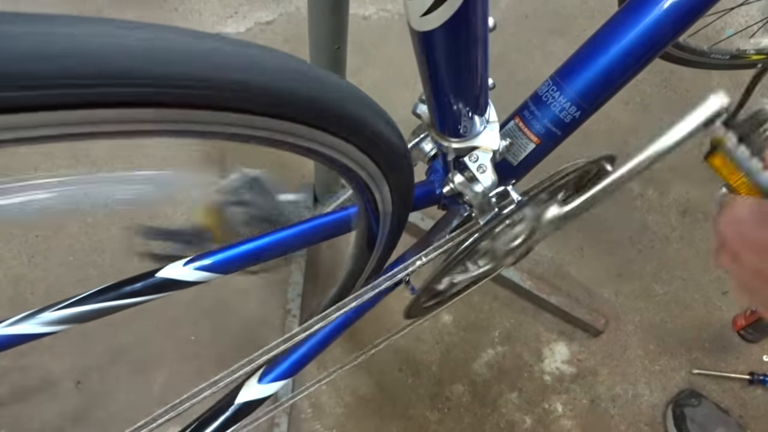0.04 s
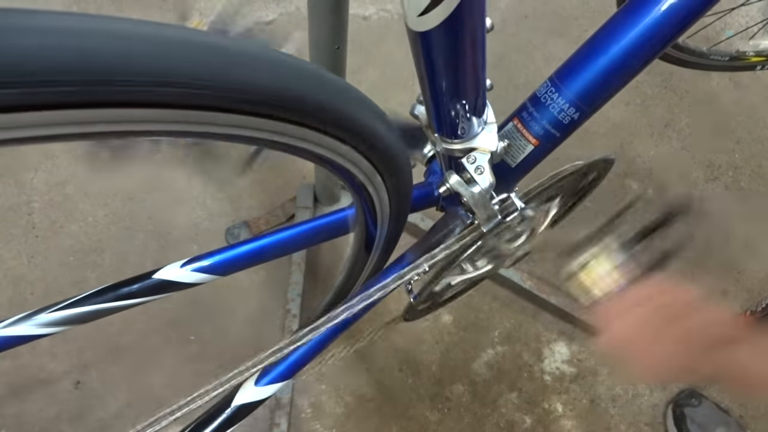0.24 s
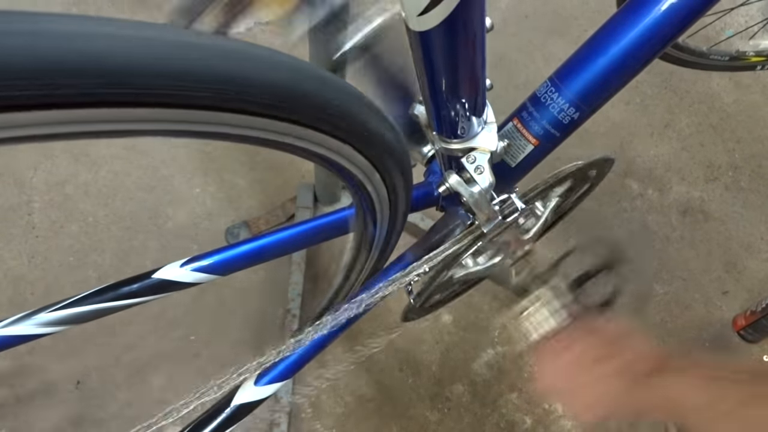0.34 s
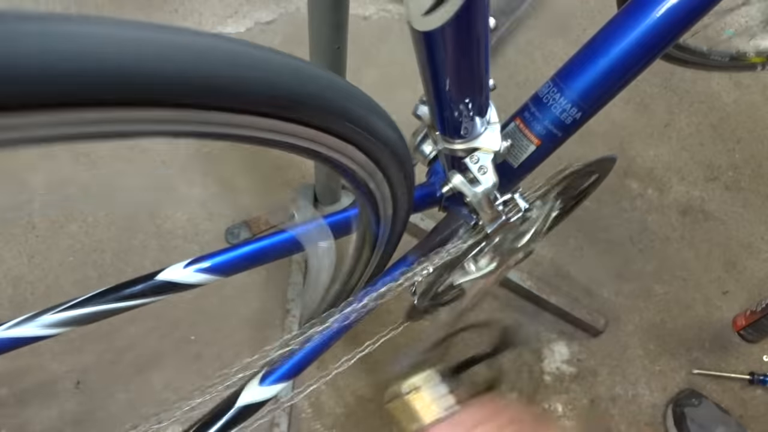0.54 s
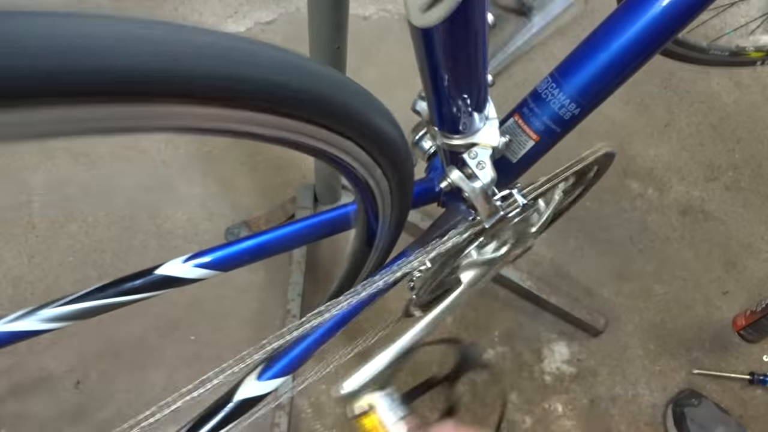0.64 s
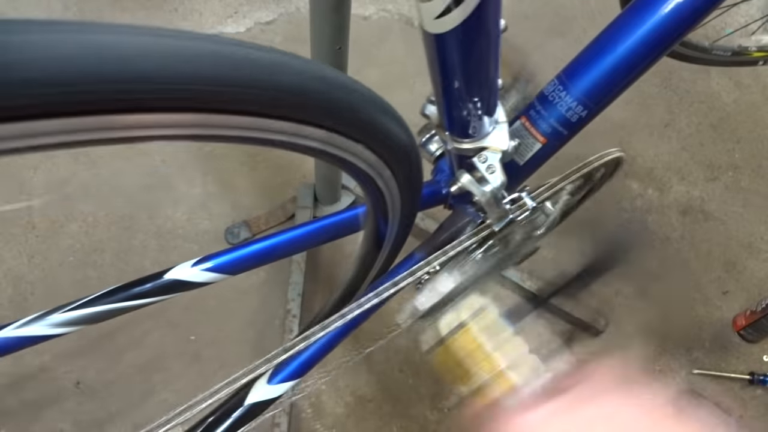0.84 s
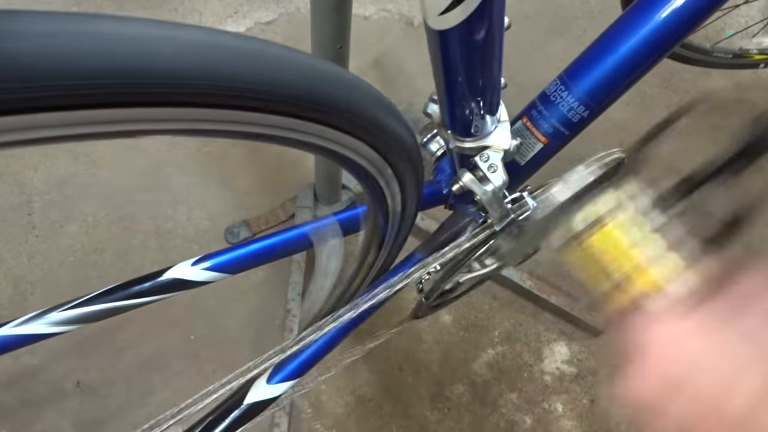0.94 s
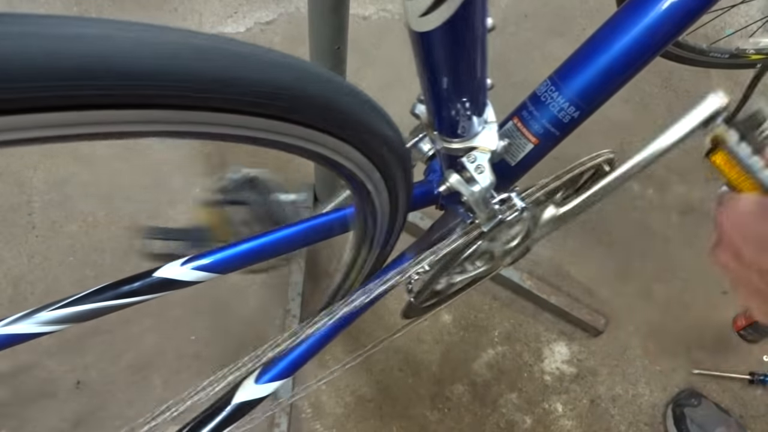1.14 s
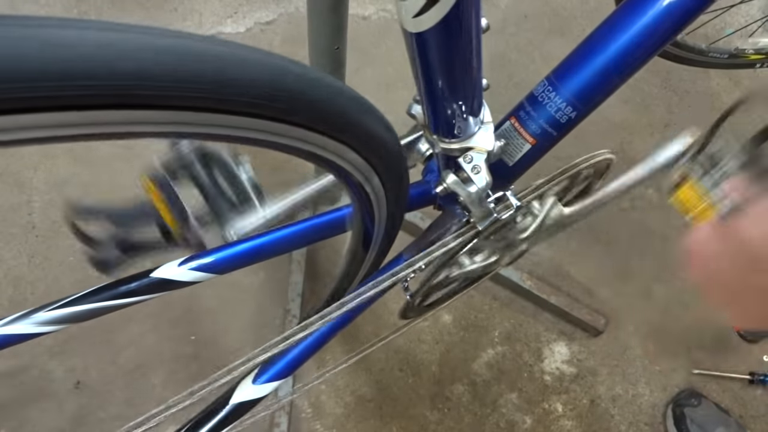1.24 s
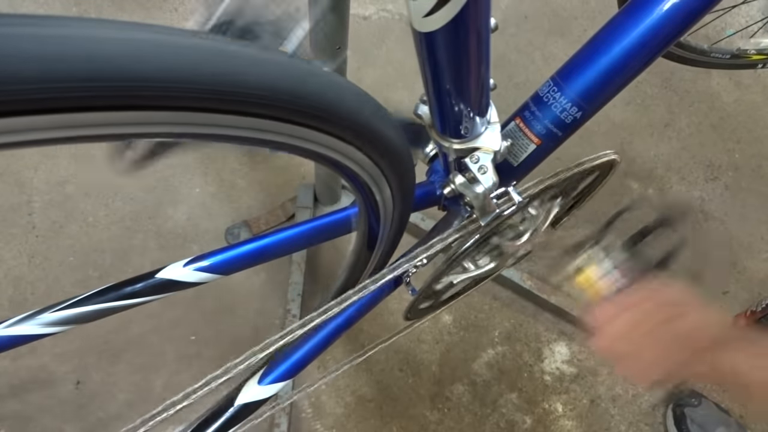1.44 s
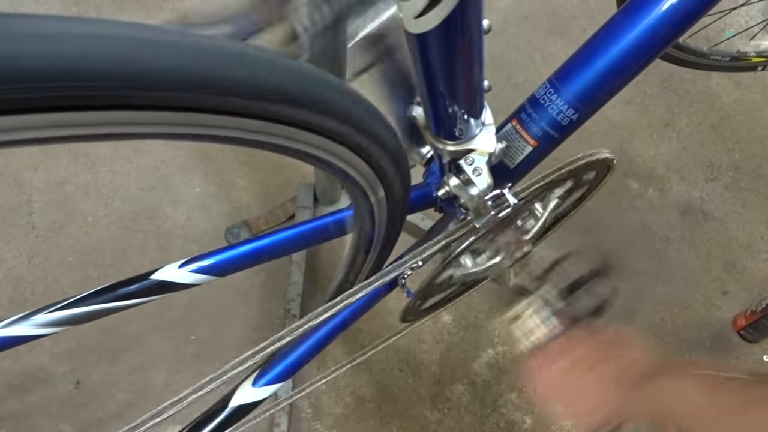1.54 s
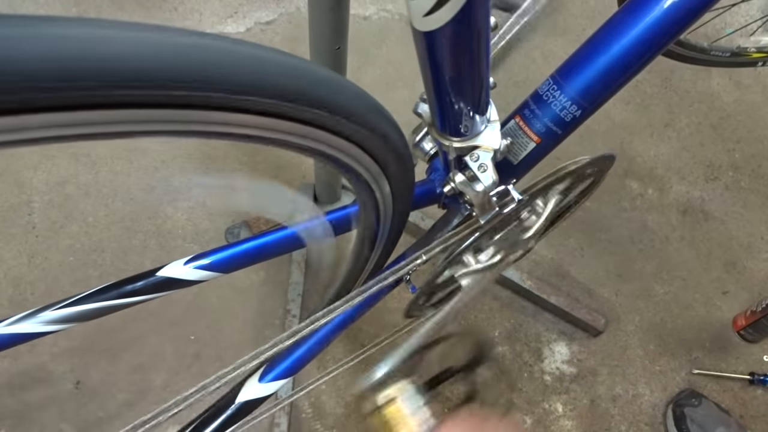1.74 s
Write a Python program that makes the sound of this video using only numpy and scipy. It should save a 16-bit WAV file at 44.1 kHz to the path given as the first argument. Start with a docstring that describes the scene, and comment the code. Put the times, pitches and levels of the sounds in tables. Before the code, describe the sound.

A bicycle chain, cranked by hand, ticks rapidly and softly over metal teeth. From 0.23 to 0.7 seconds it scrapes and clatters across the gears in a dense, bright rattle. It runs lightly again, with a hollow pedal knock near 1.1. A hard clank hits at 1.22, then a short crunching shift at 1.37-1.46, fading to quiet ticking. Close, hard-walled workshop echo, faint steady low background noise.

```python
"""In a hard-walled workshop, a bicycle on a repair stand is cranked by hand. Its chain ticks over
the teeth, then twice climbs across the gears: it scrapes, clashes with the cogs and drops into place.
Bursts of tiny contacts excite the frame, chainring, cogs and links, each a crack with ringing modes.
A loose pedal knocks, the stand thuds, steady noise lies behind and fading noise makes the room's echo."""
import sys
import numpy as np
from scipy import signal
from scipy.fft import rfft, irfft
from scipy.io import wavfile

SR = 44100
rng = np.random.default_rng(int(sys.argv[2]) if len(sys.argv) > 2 else 0)


def generate_wav(signal):
    """Clip the signal to [-1, 1] and save it as 16-bit WAV at the path in sys.argv[1]."""
    frames = np.transpose(np.atleast_2d(signal))
    scaled = np.clip(frames, -1, 1) * 32767
    pcm = np.round(scaled).astype(np.int16)
    wavfile.write(sys.argv[1], SR, pcm)


N = 79380  # length in samples: 1.8 s

# steady background noise: colour (f/Hz, level/dB)
BACKGROUND_COLOUR = [(25, -15), (55, -11), (85, -4.5), (120, -9.5), (165, 1.5), (250, 0), (520, 1),
                     (1000, -3.5), (3000, -8), (15000, -67)]
BACKGROUND_DB = -45.5
# workshop echo (f/Hz, time to fade by 60 dB/s, level against the direct sound/dB)
ROOM_BANDS = [(122, 0.99, 2), (367, 0.63, -1.5), (1280, 0.64, -2), (3670, 0.49, -2.5), (8750, 0.33, -5),
              (15000, 0.16, -12.5)]
ROOM_DELAY_S = 0.00324
# left-right difference: background and echo, then the direct sound
ROOM_SIDE_DB, DIRECT_SIDE_DB = -11.5, -19
TOP_HZ = 15800  # treble above this is cut

# colour of each part's short crack (f/Hz, level/dB)
STAND_COLOUR = [(70, -31), (118, 3), (190, 2.5), (300, -7), (600, -25)]
FRAME_COLOUR = [(60, -43), (130, -10.5), (300, -3.5), (600, 4), (1500, -4.5), (2600, -6.5), (6000, -21)]
CHAINRING_COLOUR = [(500, -33), (1300, -7.5), (1900, -3), (2700, -1), (3400, -1.5), (4200, -6),
                    (9000, -19.5)]
COG_COLOUR = [(900, -50), (2800, -1), (4000, -2.5), (5400, -1.5), (8000, -7), (15000, -27)]
LINK_COLOUR = [(800, -29), (3500, -2), (7500, 2.5), (10500, 4.5), (14000, 1), (16000, 1)]
# ringing pitches of each part (f/Hz, level over the crack/dB, time for the clank to fade by 60 dB/s)
PEDAL_MODES = [(356, 14.4, 0.017), (999, 16.2, 0.026)]
FRAME_MODES = [(429.5, 5, 0.022), (747, -1.5, .03), (1267, 13, 0.015)]
CHAINRING_MODES = [(1773, 4.7, 0.014), (2073, 2.7, .025), (2512, 4.1, .018), (2692, 11.3, 0.016),
                   (3186, 4.2, 0.027), (3364, 0.93, 0.029)]
COG_MODES = [(4030, 14.7, 0.021), (4240, 5, 0.028), (4790, 6.6, 0.022)]
LINK_MODES = [(10260, -1.7, 0.024)]
# faint ring after each clank: level against the clank, time to fade by 60 dB
FREE_RING_DB, FREE_RING_T60_S = -15, 0.18
# the second shift uses a bigger chainring with lower pitches
BIG_RING_FROM_S, BIG_RING_SCALE = 0.9, 0.93

# tiny metal contacts
CONTACTS_PER_S, CONTACT_SPREAD_DB = 8000, 3
# chinks: very short pings mixed with the contacts
CHINK_LOW_HZ, CHINK_HIGH_HZ, CHINK_PITCHES = 2185, 15450, 48
CHINKS_PER_S, CHINK_DECAY_S, CHINK_DB = 2500, 0.0019, -2
# uneven colour of a volley: step between ripple points, size of the ripple
VOLLEY_RIPPLE_HZ, VOLLEY_RIPPLE_DB = 328.5, 5.5

# thuds of the jolted stand (t/s, level/dB)
THUDS = [(0.576, -41.5), (1.235, -38), (1.391, -39)]
THUD_DECAY_S = 0.024
# knocks of the loose pedal (t/s, level/dB)
PEDAL_KNOCKS = [(.095, -43), (.18, -35), (0.91, -31), (1.081, -23.5), (1.177, -34)]
PEDAL_FADE_S = 0.0028

# running chain over time (t/s, level of the links/dB)
RUNNING_LEVEL = [(0, -41.5), (.2, -38.5), (.5, -52), (.8, -38.5), (1.1, -38.5), (1.3, -35.5), (1.62, -40),
                 (1.8, -43.5)]
# places where links meet teeth (share of a link's period, tick decay/s, level/dB)
MESHES = [(0.1, 0.0099, 0), (0.701, 0.0015, -24)]
LINKS_PER_S, MESH_JITTER_S, TICK_SPREAD_DB = 33, 0.0024, 2.5
ROLL_DB = -7.5  # roller rustle against a full tick
# running sound in the other parts, against the links
RUN_FRAME_DB, RUN_RING_DB, RUN_COG_DB = -13, -17.5, -14

# one curve per shift: chain dragging over the teeth (t/s, frame level/dB, teeth level/dB, link level/dB)
SCRAPES = [
    [(.258, -45.5, -51, -24.5), (.305, -42, -35, -26.5), (.325, -31.5, -36.5, -24), (.44, -30, -33, -25),
     (.48, -42, -52, -36.5), (.56, -49, -59, -28), (.62, -43, -37, -29), (.66, -62, -60, -40)],
    [(1.374, -29, -32.5, -20), (1.405, -31.5, -26.5, -30), (1.435, -47, -43, -30), (1.47, -37, -49, -34),
     (1.52, -44, -42, -62)],
]
# catches of the plates within a scrape
CHATTER_PER_S, CHATTER_DECAY_S, CHATTER_DB = 110, 0.0015, 6.5

# chain clashes (t/s, length/s, frame knock level/dB, chainring clank level/dB, cog ring level/dB,
# link chink level/dB, struck cog f/Hz)
CLASHES = [ (0.2315, 0.0034, -44, -25, -40, -42, 4200), (0.2427, 0.004, -58, -28, -28.5, -25, 4220),
           (.2595, 0.0041, -48, -22.5, -29, -17.5, 4270), (0.265, 0.0081, -39, -48, -31, -24, 5400),
           (0.283, .0071, -38, -29, -24, -19.5, 4100), (0.29, 0.0073, -34, -21, -36, -38, 4070),
           (0.3086, .006, -17, -17.5, -42, -25, 4200), (0.317, 0.0055, -25, -22, -21.5, -24, 4020),
           (0.337, 0.013, -29, -28, -27.5, -22, 3820), (.371, 0.0091, -24.5, -26, -32, -18.5, 5200),
           (0.404, 0.0072, -28, -21, -25, -23, 4530), (0.4258, 0.0046, -20, -26, -30, -37, 4060),
           (.451, 0.0071, -24.5, -28, -20.5, -35, 4170), (.4905, 0.0059, -42, -25.5, -34, -37, 3980),
           (0.5022, 0.0096, -29.5, -21.5, -19.5, -22.5, 4040), (0.529, 0.0042, -55, -29, -31, -29, 4080),
           (0.5427, 0.0073, -27, -25.5, -24, -33, 4085), (0.5573, 0.0064, -35, -28.5, -19.5, -16, 5210),
           (0.579, 0.0095, -29, -33, -43, -23, 5140), (0.61, 0.0036, -31, -24.5, -21.5, -25, 5500),
           (0.6152, 0.0027, -41, -23.5, -17, -22, 5160), (0.629, 0.0077, -36, -29, -31, -32, 5160),
           (0.684, 0.0051, -24.5, -48, -35.5, -19, 5250), (0.804, 0.0016, -65, -57, -40, -28, 5300),
           (0.9704, 0.0037, -51, -36.5, -32, -49, 4020), (1.029, 0.0027, -65, -48, -49, -25.5, 5250),
           (1.081, 0.0026, -53, -33.5, -36, -17, 3700), (1.2242, 0.0041, -14, -17.5, -19, -22.5, 3990),
           (1.3734, 0.0042, -48, -23, -21.5, -19.5, 4340), (1.397, .0063, -20.5, -26, -21, -25, 4800),
           (1.409, 0.0041, -23, -30, -26, -27, 4070), (1.414, 0.0077, -30, -27, -38, -18, 4100),
           (1.425, 0.0052, -52, -24.5, -30, -19.5, 5150), (1.444, 0.0036, -29, -28, -22.5, -14.5, 4170),
           (1.455, 0.0061, -34, -30, -27, -26, 4300), (1.577, 0.0084, -55, -43, -34.5, -60, 3920),
           (1.773, 0.0016, -69, -63, -50, -32, 5250)]
ATTACK_S, RELEASE_S = 0.00026, 0.00144


def undb(db):
    """Turn decibels into gain."""
    return 10 ** (np.asarray(db) / 20)


def unit(x):
    """Scale a sound so its squared samples add up to one."""
    return x / np.sqrt(np.sum(x ** 2) + 1e-18)


def rms_one(x):
    """Scale a full-length sound to an average strength (rms) of one."""
    return np.sqrt(N) * unit(x)


def through(x, response):
    """Let a sound set off a body or room, given its answer to one sharp tap."""
    return signal.fftconvolve(x, response)[:N]


def add(out, start, sound):
    """Mix a sound in at its starting time."""
    at = int(start * SR)
    out[at:at + len(sound)] += sound[:N - at]


def crack(points, size=2048):
    """A short answer to a tap, with the given colour and its energy as early as possible."""
    hz, db = np.array(points).T
    pitch = np.log(np.fft.rfftfreq(size, 1 / SR) + 1)
    gain = undb(np.interp(pitch, np.log(hz), db))
    # folding the cepstrum (spectrum of the log gain) puts everything after the tap
    cepstrum = irfft(np.log(gain))
    cepstrum[1:size // 2] *= 2
    cepstrum[size // 2 + 1:] = 0
    return unit(irfft(np.exp(rfft(cepstrum))))


def part(colour, modes, scale=1):
    """A metal part cracks, its modes clank briefly, then ring on faintly; scale shifts its pitch."""
    t = np.arange(N // 6) / SR
    out = signal.unit_impulse(len(t))
    for hz, db, t60 in modes:
        wave = np.cos(2 * np.pi * hz * scale * t)
        for ring_db, ring_t60 in ((db, t60), (db + FREE_RING_DB, FREE_RING_T60_S)):
            fade = undb(-60 * t / ring_t60)
            out += 2 * undb(ring_db) * fade / fade.sum() * wave
    shifted_colour = [(hz * scale, db) for hz, db in colour]
    return unit(signal.fftconvolve(out, crack(shifted_colour)))


def contacts():
    """Dense tiny metal contacts: random clicks of uneven size, rms one."""
    hit = rng.random(N) < CONTACTS_PER_S / SR
    size = undb(CONTACT_SPREAD_DB * rng.standard_normal(N))
    return rms_one(hit * rng.choice([-1, 1], N) * size)


def chinks():
    """Sparse taps set off very short pings at many pitches, rms one."""
    out = 0
    for hz in np.linspace(CHINK_LOW_HZ, CHINK_HIGH_HZ, CHINK_PITCHES):
        hit = rng.random(N) < CHINKS_PER_S / CHINK_PITCHES / SR
        taps = hit * rng.standard_normal(N)
        # each step turns the ping a little and shrinks it
        turn = np.exp((2j * np.pi * hz - 1 / CHINK_DECAY_S) / SR)
        out = out + signal.lfilter([1], [1, -turn], taps).imag
    return rms_one(out)


def grind():
    """Dry contacts of metal on metal mixed with chinks, rms one."""
    return rms_one(contacts() + undb(CHINK_DB) * chinks())


def volley(shape):
    """A burst of contacts: noise under an envelope, with an uneven colour of its own."""
    hz = np.fft.rfftfreq(len(shape), 1 / SR)
    ripple = np.clip(rng.standard_normal(128), -1.5, 1.5)
    ripple_db = VOLLEY_RIPPLE_DB * np.interp(hz / VOLLEY_RIPPLE_HZ, np.arange(len(ripple)), ripple)
    # the ripple is weaker in the bass
    colour = undb(ripple_db * np.minimum(hz / CHINK_LOW_HZ, 1))
    burst = shape * rng.standard_normal(len(shape))
    # impose colour and envelope in turn, keeping the random phases
    for _ in range(2):
        phase = np.angle(rfft(burst))
        burst = np.sqrt(shape) * irfft(colour * np.exp(1j * phase), len(shape))
    return unit(burst) * np.sqrt(np.sum(shape ** 2))


def background():
    """Steady background: random noise given a fixed colour."""
    return undb(BACKGROUND_DB) * through(rng.standard_normal(N), crack(BACKGROUND_COLOUR))


def workshop(t):
    """The room's diffuse echo: noise bands that fade, sooner and weaker in the high treble."""
    hz, t60, db = np.array(ROOM_BANDS).T
    noise = rfft(rng.standard_normal(N))
    pitch = np.log(np.fft.rfftfreq(N, 1 / SR) + 1)
    out = 0
    for k, band in enumerate(np.eye(len(hz))):
        fade = unit(undb(-60 * t / t60[k]) * (t > ROOM_DELAY_S))
        band_noise = irfft(noise * np.interp(pitch, np.log(hz), band), N)
        out = out + undb(db[k]) * fade * band_noise
    return out


def stand(t):
    """Jolts shake the stand: fading bursts of contacts become short low rumbles."""
    shape = np.zeros(N)
    for start, db in THUDS:
        shape += undb(db) * (t > start) * np.exp(-np.abs(t - start) / THUD_DECAY_S)
    return through(shape * contacts(), crack(STAND_COLOUR))


def pedal(t, size=1024):
    """Play in the pedal lets it knock the frame, which answers with a few hollow modes."""
    out = np.zeros(N)
    body = part(FRAME_COLOUR, PEDAL_MODES)
    push = np.exp(-(t[:size] / PEDAL_FADE_S) ** 2)
    for start, db in PEDAL_KNOCKS:
        add(out, start, undb(db) * through(volley(push), body))
    return out


def running(t):
    """Links tick onto the teeth and rollers rustle between; gives the drive on each part."""
    shape = np.full(N, undb(ROLL_DB))
    for share, decay, db in MESHES:
        scatter = np.clip(rng.standard_normal((100, 2)), -2, 2)
        for link, (late, size) in enumerate(scatter):
            at = int(((link + share) / LINKS_PER_S + MESH_JITTER_S * late) * SR)
            if 0 <= at < N:
                age = t[:min(N - at, SR // 20)]
                shape[at:at + len(age)] += undb(db + TICK_SPREAD_DB * size) * np.exp(-age / decay)
    level = undb(np.interp(t, *np.array(RUNNING_LEVEL).T))
    # frame, chainring, cog, links
    drives = ((RUN_FRAME_DB, contacts), (RUN_RING_DB, contacts), (RUN_COG_DB, grind), (0, grind))
    return np.array([undb(db) * level * rms_one(shape * grain()) for db, grain in drives])


def chatter(t):
    """Plates catch on teeth at uneven moments, each catch a brief surge; rms one."""
    catches = 1.0 * (rng.random(N) < CHATTER_PER_S / SR)
    surges = through(catches, np.exp(-t / CHATTER_DECAY_S))
    return rms_one(1 + undb(CHATTER_DB) * surges)


def scrapes(t):
    """Side plates grind along the teeth during each shift; gives the drive on each part."""
    force = np.zeros((4, N))
    for curve in SCRAPES:
        times, frame, teeth, link = np.array(curve).T
        during = (t > times[0]) & (t < times[-1])
        # chainring and cog share the teeth level
        force += np.array([during * undb(np.interp(t, times, db)) for db in (frame, teeth, teeth, link)])
    return force * np.array([contacts(), grind(), grind(), grind()])


def clashes(t, frame, links, size=1024):
    """Each clash is a short volley of contacts on frame, chainring, links and one of the cogs."""
    out = np.zeros(N)
    age = t[:size]
    for start, length, *levels, cog_hz in CLASHES:
        release = np.exp(-np.clip((age - length) / RELEASE_S, 0, 20))
        shape = np.clip(age / ATTACK_S, 0, 1) * release
        # chainring pitch varies a little from blow to blow
        scale = BIG_RING_SCALE if start > BIG_RING_FROM_S else 1
        scale *= 1 + rng.uniform(-0.03066, 0.021)
        chainring = part(CHAINRING_COLOUR, CHAINRING_MODES, scale)
        cog = part(COG_COLOUR, COG_MODES, cog_hz / COG_MODES[0][0])
        for db, response in zip(levels, (frame, chainring, cog, links)):
            add(out, start, undb(db) * through(volley(shape), response))
    return out


def drivetrain(t):
    """All sounds of the bicycle and its stand: the drives and blows passed through the metal parts."""
    frame = part(FRAME_COLOUR, FRAME_MODES)
    cog = part(COG_COLOUR, COG_MODES)
    links = part(LINK_COLOUR, LINK_MODES)
    small_ring = part(CHAINRING_COLOUR, CHAINRING_MODES)
    big_ring = part(CHAINRING_COLOUR, CHAINRING_MODES, BIG_RING_SCALE)
    on_frame, on_ring, on_cog, on_links = scrapes(t) * chatter(t) + running(t)
    big = t > BIG_RING_FROM_S
    chainrings = through(on_ring * ~big, small_ring) + through(on_ring * big, big_ring)
    bike = through(on_frame, frame) + chainrings + through(on_cog, cog) + through(on_links, links)
    return bike + stand(t) + pedal(t) + clashes(t, frame, links)


def scene():
    """The drivetrain close in front, with room and background nearly centred."""
    t = np.arange(N) / SR
    bike = drivetrain(t)
    mid = through(bike, workshop(t)) + background()
    side = undb(ROOM_SIDE_DB) * (through(bike, workshop(t)) + background())
    # a quarter-cycle-shifted copy: slight phase difference between the microphones
    side = side + undb(DIRECT_SIDE_DB) * signal.hilbert(bike).imag
    return bike + mid + side * np.array([[1], [-1]])


def record(dry):
    """A steep low-pass filter cuts off the highest treble."""
    return signal.sosfilt(signal.ellip(10, 0.2, 80, TOP_HZ, fs=SR, output="sos"), dry)


dry = scene()
out = record(dry)
generate_wav(out)
```